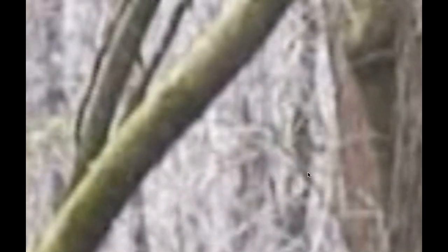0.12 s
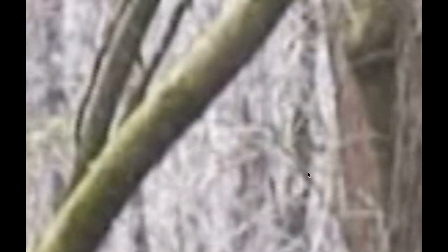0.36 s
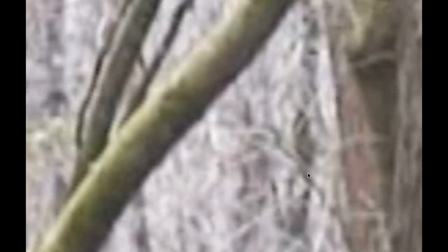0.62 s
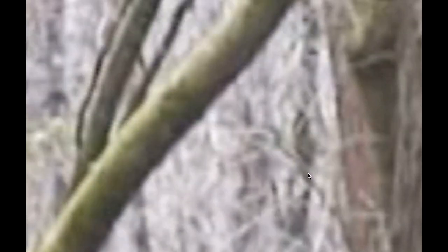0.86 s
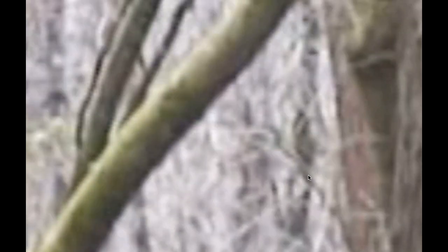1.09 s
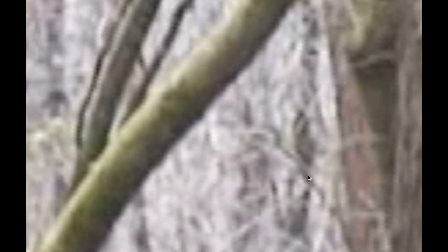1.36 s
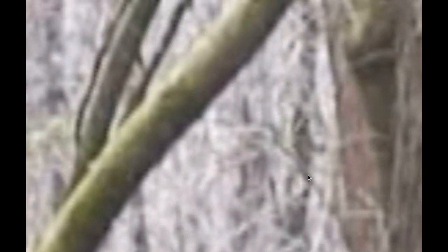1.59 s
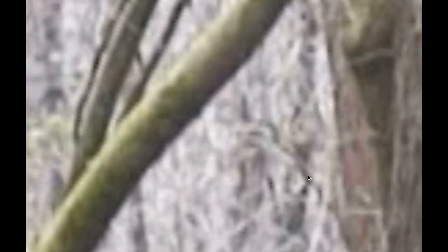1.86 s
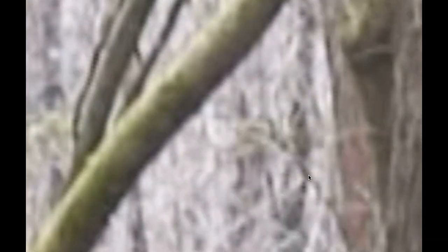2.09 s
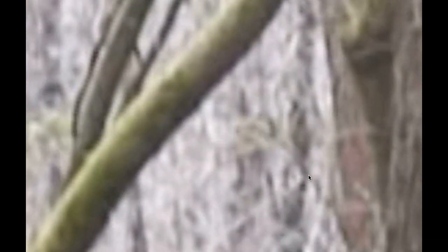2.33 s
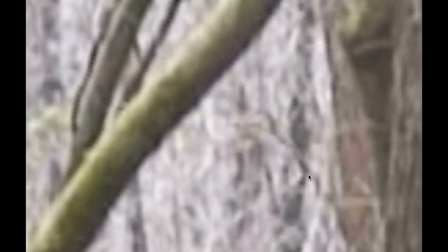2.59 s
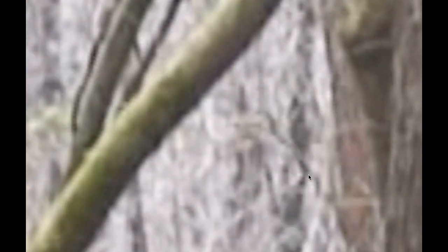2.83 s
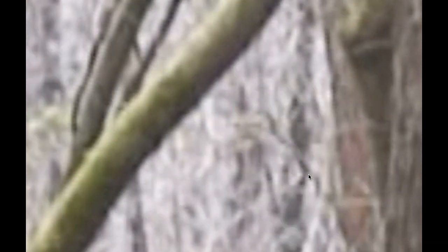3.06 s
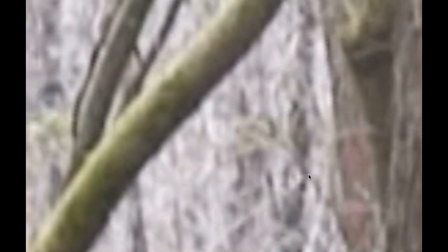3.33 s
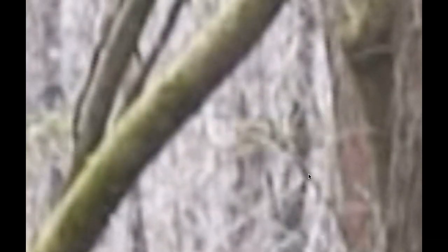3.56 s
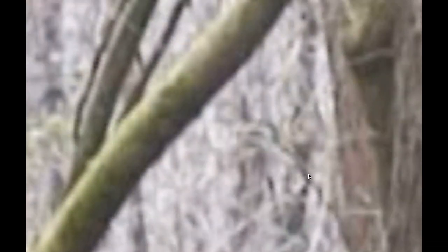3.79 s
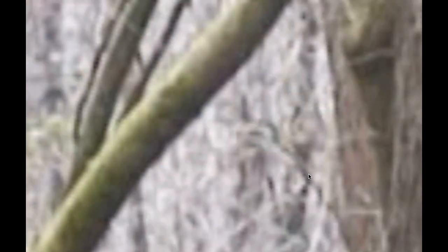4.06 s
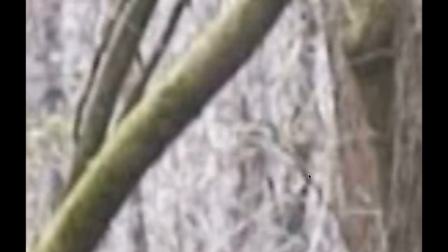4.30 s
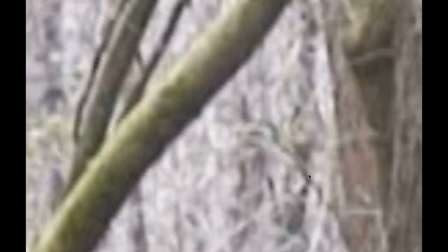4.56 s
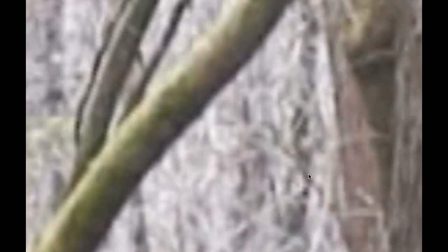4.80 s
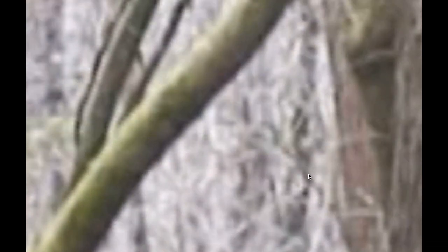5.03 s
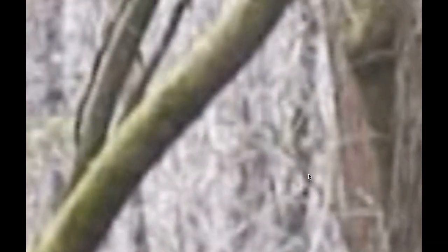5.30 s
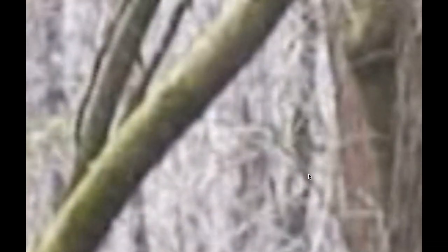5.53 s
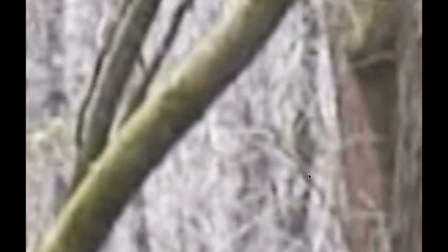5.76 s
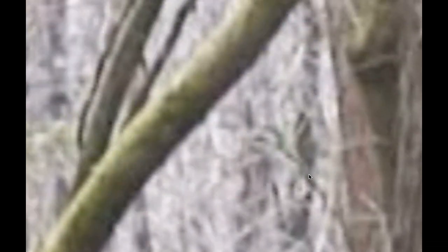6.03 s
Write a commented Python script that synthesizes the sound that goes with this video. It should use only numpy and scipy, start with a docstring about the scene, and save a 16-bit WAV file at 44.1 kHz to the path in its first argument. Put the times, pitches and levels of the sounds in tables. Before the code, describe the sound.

Soft key taps come in uneven bursts with pauses, ringing low through a laptop case, above a constant fan drone, hiss and thin whine.

```python
"""A low fan hum with hiss and a faint whine, then light typing on a laptop in a quiet room.
The microphone sits in the case: the fan shakes its modes, each thump pushes it and it rings on rubber feet.
Key clicks are bursts of tiny contacts ringing cap and plate; wires snap and buzz as keys spring back.
Fingers rustle more while typing, and skin slides once over the palm rest: both are coloured noise.
The sound card adds shaped hiss and sines near multiples of 1 kHz."""
import sys
import numpy as np
from scipy import signal
from scipy.fft import rfft, irfft, next_fast_len
from scipy.io import wavfile
from scipy.ndimage import uniform_filter1d, map_coordinates

SR = 44100
rng = np.random.default_rng(int(sys.argv[2]) if len(sys.argv) > 2 else 0)


def gain_from_db(level_db):
    """Turn a decibel level (scalar or array-like) into a linear amplitude factor."""
    decades = np.asarray(level_db, float) / 20
    return 10 ** decades


def unload_wav(signal):
    """Save mono or channel-first audio to the path in sys.argv[1] as 16-bit WAV at rate SR, clipped to [-1, 1]."""
    wavfile.write(
        sys.argv[1],
        SR,
        np.round(np.clip(np.atleast_2d(signal).T, -1, 1) * 32767).astype(np.int16),
    )


N = 270950

# key contacts: contact_s, knock_db, clack_db, tick_db (relative)
KEY_CONTACTS = [(0.4221, -50.5, -47.5, -54.5), (.4928, -53, -56, -66), (0.53, -57, -51, -63),
                (0.5364, -45.5, -38.5, -50), (.5444, -56, -51, -66), (0.5555, -51, -48, -65),
                (0.6173, -48, -44.5, -70), (0.6233, -60.5, -41.5, -44.5), (1.1867, -64, -52, -49),
                (1.255, -58, -73, -61), (1.2685, -53, -58, -54), (1.4656, -55.5, -59.5, -65.5),
                (1.517, -43, -46.5, -52), (1.5455, -55.5, -52, -60.5), (1.568, -64, -62.5, -53),
                (1.5868, -47, -57, -61), (1.5994, -47.5, -50.5, -52.5), (1.6641, -73, -73, -60),
                (1.6836, -46, -50.5, -51), (1.7404, -59, -59, -56.5), (1.7584, -48.5, -56, -57.5),
                (1.8144, -66, -61, -67), (1.8704, -60, -69, -63), (1.9672, -69, -58, -48.5),
                (2.0308, -54.5, -63, -58.5), (2.1036, -52, -61, -70), (2.13, -68, -60, -55),
                (2.174, -62.5, -65.5, -60), (2.1959, -65, -59, -60), (2.2567, -57, -68, -76),
                (2.2889, -60, -60.5, -59), (2.35, -58, -62, -65), (2.405, -59, -65, -74),
                (2.441, -68, -64, -67), (2.6339, -64, -54.5, -70.5), (3.027, -57.5, -52.5, -78),
                (3.191, -62, -55.5, -59.5), (3.261, -51, -42.5, -58), (3.3225, -68.5, -56, -56.5),
                (3.4053, -64, -53, -78), (3.4316, -53, -48.5, -72), (3.4441, -52.5, -44.5, -67.5),
                (3.4889, -72.5, -51.5, -78), (3.5272, -58, -55, -55.5), (3.5743, -61, -50, -61),
                (3.6206, -54, -48.5, -52.5), (3.6745, -57, -53.5, -60), (3.804, -62, -49, -47.5),
                (3.824, -59, -54, -64), (3.8804, -52, -53, -73), (3.8876, -54.5, -46.5, -59.5),
                (3.9436, -52, -42.5, -59.5), (3.9769, -59, -53, -81), (4.7328, -53.5, -43.5, -44.5),
                (4.8203, -63, -47.5, -64), (4.8263, -49, -44.5, -57), (4.8316, -57.5, -44.5, -55),
                (4.8516, -55, -49.5, -54), (5.1223, -68, -57, -73), (5.4512, -53, -51.5, -54),
                (5.5163, -56, -53, -67), (5.523, -52, -52, -63), (5.5727, -65, -50.5, -55),
                (5.578, -59, -52, -60), (5.594, -75, -60, -67), (5.6158, -62, -47, -55.5),
                (5.655, -69, -53.5, -54), (5.7166, -52.5, -50, -60), (5.7565, -48, -48, -51.5),
                (5.7626, -43, -61.5, -57), (5.7794, -72, -52, -65), (5.8112, -60.5, -51.5, -56.5),
                (5.9055, -42.5, -50, -52), (5.962, -57.5, -55.5, -54.5), (6.012, -55.5, -57, -52),
                (6.0936, -64, -55, -58)]
# soft fingertip pushes on the case: strike_s, case_db, panels_db (relative), time_until_hand_damps_s
CASE_STRIKES = [(.021, -43.5, -64, 0.027), (0.122, -46, -72, 0.025), (.424, -30.5, -38, 0.094),
                (.537, -31, -38, 0.018), (.553, -27.5, -46, 0.033), (0.619, -35, -46, 0.046),
                (.734, -46, -59, 0.037), (0.839, -41, -50, 0.086), (1.099, -52, -55.5, 0.066),
                (1.189, -40, -51, 0.045), (1.283, -36, -44, 0.075), (1.374, -38, -54, 0.033),
                (1.41, -41, -60, 0.093), (1.469, -35.5, -48, 0.083), (1.518, -41, -34.5, .045),
                (1.549, -35.5, -55, 0.042), (1.579, -25.5, -36, 0.086), (1.611, -25.5, -40.5, 0.039),
                (1.688, -31, -39.5, 0.19), (1.751, -26, -42.5, 0.056), (1.789, -33, -49.5, 0.027),
                (1.865, -36.5, -46, 0.072), (1.898, -37, -46, 0.036), (1.96, -37.5, -45, 0.081),
                (2.029, -36.5, -44, 0.061), (2.05, -28.5, -41.5, 0.051), (2.109, -35, -43.5, 0.074),
                (2.196, -33.5, -41.5, 0.022), (2.264, -32, -46, 0.027), (2.344, -38, -41.5, 0.094),
                (2.407, -34, -42, 0.055), (2.516, -35.5, -46, 0.081), (2.635, -43.5, -53, 0.095),
                (2.904, -41.5, -56, 0.043), (3.04, -33, -48, 0.013), (3.109, -47, -64, 0.069),
                (3.325, -28.5, -41.5, .054), (3.405, -35.5, -50.5, 0.11), (3.45, -36, -47, 0.085),
                (3.535, -22.5, -42, 0.043), (3.575, -37, -53, 0.021), (3.627, -38, -48.5, 0.035),
                (3.686, -30.5, -40, 0.016), (3.708, -32.5, -55, 0.031), (3.807, -43, -47, 0.071),
                (3.898, -27.5, -39.5, 0.054), (3.946, -34, -48, 0.04), (4.049, -39, -52, 0.051),
                (4.744, -25.5, -36.5, 0.067), (4.837, -31, -37.5, .059), (5.14, -44.5, -73, 0.034),
                (5.455, -22.5, -40, 0.058), (5.528, -40, -39.5, 0.027), (5.568, -33.5, -50, 0.068),
                (5.629, -36.5, -47, .038), (5.661, -22, -40, 0.047), (5.715, -31, -41, 0.062),
                (5.764, -30.5, -45, 0.043), (5.818, -24, -41.5, 0.043), (5.859, -32.5, -43.5, 0.1),
                (5.91, -36, -41, .036), (5.965, -23.5, -35.5, 0.054), (6.014, -45, -44, 0.044),
                (6.105, -28.5, -42, 0.042)]


def unit(x):
    """Scaled to rms 1."""
    return x / np.sqrt(np.mean(x ** 2) + 1e-20)


def wobble(rate_hz):
    """A smooth random curve through rate_hz knots a second."""
    knots = rng.standard_normal(int(N * rate_hz / SR) + 4)
    return map_coordinates(knots, [np.arange(N) * rate_hz / SR])


def filtered(x, response):
    """x through a complex response of frequency."""
    m = next_fast_len(N + 8192)
    return irfft(rfft(x, m) * response(np.fft.rfftfreq(m, 1 / SR)), m)[:N]


def noise(response):
    """Noise of rms 1 shaped by a response of frequency."""
    return unit(filtered(rng.standard_normal(N), response))


def coloured(points):
    """Noise of rms 1 along (Hz, dB) points on a log axis."""
    point_hz, point_db = np.transpose(points)
    return noise(lambda hz: gain_from_db(np.interp(np.log(hz + 1), np.log(point_hz + 1), point_db)))


def resonances(modes):
    """Causal response of (Hz, width Hz, dB) modes, neighbours in opposite phase."""
    def response(hz):
        total = 0
        for k, (centre_hz, width_hz, db) in enumerate(modes):
            damping = 1j * hz * width_hz
            total = total + (-1) ** k * gain_from_db(db) * damping / (centre_hz ** 2 - hz ** 2 + damping)
        return total
    return response


def ring(modes, t, attack_s, scatter_db, detune):
    """One push on (Hz, dB, t60 s) modes, each at a new strength and pitch, neighbours in opposite phase."""
    hz, db, t60_s = np.transpose(modes)[:, :, None]
    strength, shift = rng.standard_normal((2, len(modes), 1))
    sign = (-1) ** np.arange(len(modes))[:, None]
    envelope = gain_from_db(db + scatter_db * strength - 60 * t / t60_s)
    waves = sign * envelope * np.sin(2 * np.pi * hz * (1 + detune * shift) * t)
    return waves.sum(axis=0) * (1 - np.exp(-t / attack_s))


def chatter(t, rise_s, fall_s, grain_db):
    """A burst of tiny uneven contacts, energy 1."""
    sizes = gain_from_db(grain_db * rng.standard_normal(len(t))) * rng.standard_normal(len(t))
    burst = sizes * (1 - np.exp(-t / rise_s)) * np.exp(-t / fall_s)
    return burst / np.linalg.norm(burst)


def rung(blows, modes, top_hz):
    """Blows ringing in a set of modes, rolled off steeply above top_hz."""
    def response(hz):
        x = hz / top_hz
        return resonances(modes)(hz) / (1 + 1j * x) ** 2 / np.sqrt(1 + x ** 12)
    return filtered(blows[:N], response)


def add(track, start_s, sound):
    """Lays a sound on the track at start_s."""
    track[round(start_s * SR):][:len(sound)] += sound


def fan():
    """The fan drones at multiples of its speed and shakes the case modes steadily."""
    # case modes: centre_hz, width_hz, level_db (relative)
    hum_modes = [(119, 8.9, -8.5), (167, 16, -8), (202, 20.6, -7), (237, 18.6, -6.5), (259, 81, -13.5),
                 (333, 63, -19.5)]
    # drone partials: multiple_of_fan_speed, mean_level_db (rms)
    fan_orders = [(5, -61), (6, -55), (7, -62.5)]
    fan_hz = 33.43
    case = gain_from_db(-58 + .8 * wobble(3)) * noise(resonances(hum_modes))
    turns = np.cumsum(fan_hz * (1 + .004 * wobble(6))) / SR
    drone = np.zeros(N)
    for order, db in fan_orders:
        level = np.sqrt(2) * gain_from_db(db + 1.45 * wobble(8))
        drone += level * np.sin(2 * np.pi * (order * turns + rng.random()))
    return case + drone


def finger_rustle():
    """Fingers rustle as wavering coloured noise, louder where thumps are dense."""
    # spectrum: frequency_hz, density_db (relative, per Hz)
    rustle_points = [(210, -56), (350, -1), (484, -7.5), (525, -7.5), (611, -8), (1250, -14.5),
                     (1420, -14.5), (1540, -15.5), (1770, -13.5), (3000, -21), (3900, -26.5), (6600, -120)]
    rest_db, busy_db, busy_s = -68.5, 2, 0.2  # level at rest, rise at ten thumps a second, averaging span
    struck_samples = np.round(np.array(CASE_STRIKES)[:, 0] * SR).astype(int)
    struck = np.bincount(struck_samples, minlength=N)[:N] * SR / 10
    span = round(busy_s * SR)
    busy = np.abs(uniform_filter1d(uniform_filter1d(struck, span), span))
    return gain_from_db(rest_db + busy_db * np.sqrt(busy) + 0.95 * wobble(3.9)) * coloured(rustle_points)


def rumble():
    """Steady low noise under the hum."""
    # spectrum: frequency_hz, density_db (relative, per Hz)
    rumble_points = [(8.8, -14), (15, 0), (49, -0.5), (96, -7), (124, -3), (140, -10.5), (180, -22),
                     (310, -120)]
    return gain_from_db(-57.5) * coloured(rumble_points)


def sound_card():
    """Amplifier hiss as shaped noise; data-clock whine as sines at multiples of nearly 1 kHz."""
    # spectrum: frequency_hz, density_db (relative, per Hz)
    hiss_points = [(590, -21), (1000, -4.5), (1380, -12), (1930, 0.5), (2380, -9.5), (3950, -6), (4590, -5),
                   (15800, -9)]
    # clock multiples 1, 2, ..: level_db (rms)
    whine_db = [-85.5, -85.5, -88.5, -88.5, -88.5, -91.5, -89.5, -92.5, -91, -100]
    clock_hz = 999.92
    t = np.arange(N) / SR
    whine = np.zeros(N)
    for multiple, db in enumerate(whine_db, 1):
        whine += np.sqrt(2) * gain_from_db(db) * np.sin(2 * np.pi * (multiple * clock_hz * t + rng.random()))
    return gain_from_db(-69) * coloured(hiss_points) + whine


def thumps():
    """Soft fingertips push the case; it rings on rubber feet until the hand settles; the desk gives."""
    # case on its feet: pitch_hz, level_db (relative), t60_s
    case_modes = [(156.6, -13, 0.15), (201.5, -0.5, 0.38), (229.9, -11, 0.23)]
    # stiffer panels of the case: pitch_hz, level_db (relative), t60_s
    panel_modes = [(283.6, 1, 0.12), (323.9, -7.5, 0.23), (355, -7, 0.1)]
    # heavier strokes under which the desk gives: strike_s, level_db (relative)
    desk_strokes = [(0.423, -36), (1.099, -53), (1.189, -44), (1.283, -41.5), (1.549, -46), (1.58, -34.5),
                    (1.752, -37), (1.898, -44.5), (2.05, -38), (2.344, -42), (3.45, -46), (3.535, -41),
                    (4.745, -39), (4.837, -43.5), (5.662, -42), (5.817, -40)]
    out = np.zeros(N + SR)
    t = np.arange(SR // 3) / SR
    lead_s = .008  # push starts ahead of the listed time
    for strike_s, db, panel_db, free_s in CASE_STRIKES:
        damped = 0.23 + 0.66 * np.exp(-(t / free_s) ** 4)
        case = -damped * ring(case_modes, t, attack_s=0.015, scatter_db=0.36, detune=0.017)
        panels = ring(panel_modes, t, attack_s=0.0079, scatter_db=2.6, detune=0.046)
        add(out, strike_s - lead_s, gain_from_db(db + 3) * case + gain_from_db(panel_db + 4) * panels)
    push = np.sin(2 * np.pi * 85 * t) * (1 - np.exp(-t / 0.0041)) * np.exp(-t / 0.0121)  # hardly rings
    for strike_s, db in desk_strokes:
        add(out, strike_s - lead_s, gain_from_db(db + 0.5) * push)
    return out[:N]


def keys():
    """Contact bursts in the key hinge ring cap and plate; the cap scrapes before and settles after."""
    # parts of a click, each: centre_hz, width_hz, level_db (relative)
    knock_modes = [(402, 50, 1), (608, 78, 5), (776, 210, -0.5), (874, 115, 1), (1010, 510, -12.5)]
    clack_modes = [(1141, 120, -4.5), (1440, 255, -5), (1725, 306, 0), (1851, 170, 4), (2275, 93, -3),
                   (2338, 220, -5.5)]
    tick_modes = [(2090, 370, 2.5), (4020, 1180, -1.5), (4730, 590, -1.1), (5930, 610, -3.5)]
    knock, clack, tick = np.zeros((3, N + SR))
    t = np.arange(SR // 10) / SR
    for contact_s, knock_db, clack_db, tick_db in KEY_CONTACTS + brushes():
        # hinge rattles longer the more knock outweighs tick
        rattle_s = max(0.003775 + .00004 * (knock_db - tick_db), .001)
        start_s = contact_s - 0.295 * rattle_s
        # crisp keys land clean, dull ones scrape first
        loose = 1 / (1 + gain_from_db(2 * (tick_db - clack_db - 1)))
        scrape = loose * chatter(t, 0.00059, 0.005, 20)[::-1]  # swells up to the contact
        add(clack, start_s - t[-1], gain_from_db(clack_db + 22.5) * scrape)
        add(tick, start_s - t[-1], gain_from_db(tick_db + 25) * scrape)
        add(knock, start_s, gain_from_db(knock_db + 39) * chatter(t, 0.00024, 0.0012 + rattle_s, 2.9))
        add(clack, start_s, gain_from_db(clack_db + 38) * chatter(t, 0.13 * rattle_s, rattle_s, 15.2))
        add(tick, start_s, gain_from_db(tick_db + 30) * chatter(t, 0.18 * rattle_s, 0.78 * rattle_s, 2.9))
        add(clack, contact_s + .006, gain_from_db(clack_db + 14) * chatter(t, 0.0014, 0.025, 18.6))  # settling
    knocks = rung(knock, knock_modes, top_hz=2450)
    clacks = rung(clack, clack_modes, top_hz=4200)
    return knocks + clacks + rung(tick, tick_modes, top_hz=8500)


def brushes():
    """Fingers brush neighbouring caps after some keys at random; rows like KEY_CONTACTS."""
    share, mean_delay_s, scatter_db = .35, .07, 3
    mean_db = (-64, -62.5, -62)  # knock, clack, tick
    key_s = np.array(KEY_CONTACTS)[:, 0]
    pick, delay = rng.random((len(key_s), 2)).T
    brush_s = np.minimum(key_s - mean_delay_s * np.log(delay + 1e-9), N / SR)
    levels_db = mean_db + scatter_db * rng.standard_normal((len(key_s), 3))
    return list(np.column_stack([brush_s, levels_db])[pick < share])


def snaps():
    """A key springing back snaps its wire on metal hooks; the wire buzzes, less if caught hard."""
    # keys springing back: snap_s, wire_db, hook_db (relative), rattle_decay_s
    snap_rows = [(0.616, -30.5, -45, 0.0039), (.6224, -44, -70, .002), (1.518, -30, -32.5, 0.00082),
                 (1.683, -34.5, -38, 0.001), (1.692, -36.5, -65, .002), (2.543, -43.5, -69, 0.0016),
                 (3.028, -36, -62.5, .0017), (3.257, -46, -62, 0.0011), (3.325, -45, -64.5, .002),
                 (3.4435, -32.5, -49, 0.00083), (3.525, -43, -62.5, .0018), (3.625, -39, -61.5, .0013),
                 (3.9424, -35, -57, 0.0014), (4.73, -50, -75, .002), (5.448, -42, -63, .0018),
                 (5.572, -37.5, -60.5, .0018), (5.649, -44, -62, .002), (5.759, -31.5, -56, .0035),
                 (5.905, -30, -51, .0035)]
    # wire, then hooks: centre_hz, width_hz, level_db (relative)
    wire_modes = [(6800, 3300, -10.5), (8410, 45, 6.5), (8330, 350, 1.5), (9920, 1400, -4)]
    hook_modes = [(11240, 1400, 0), (11900, 1100, 0)]
    wire, hook = np.zeros((2, N + SR))
    t = np.arange(SR // 16) / SR
    for snap_s, wire_db, hook_db, rattle_s in snap_rows:
        burst = chatter(t, 0.00074, rattle_s, 7.1)
        free = 1 / (1 + gain_from_db(hook_db - wire_db + 14))
        buzz = free * gain_from_db(-4) * chatter(t, 0.004, 0.02, 9)
        add(wire, snap_s - .001, gain_from_db(wire_db + 15.5) * (burst + buzz))
        add(hook, snap_s - .001, gain_from_db(hook_db + 25) * burst)
    return rung(wire, wire_modes, top_hz=12000) + rung(hook, hook_modes, top_hz=13300)


def room(x, t60_s, dull_hz):
    """The small room answers with a short dull tail of decaying noise."""
    hz, t, z = signal.stft(rng.standard_normal(SR // 3), SR, nperseg=256)
    z = z * gain_from_db(-60 * t / t60_s) / (1 + (hz[:, None] / dull_hz) ** 2)
    tail = signal.istft(z, SR, nperseg=256)[1]
    delayed = np.pad(x, (200, 0))
    return signal.fftconvolve(delayed, tail / np.linalg.norm(tail))[:N]


def slide():
    """Skin drags briefly over the palm rest: grainy noise follows the speed of the hand."""
    # spectrum: frequency_hz, level_db (relative)
    skin_points = [(300, -44), (500, -2), (1300, -5), (1900, 1), (2600, -9.5), (6000, -11.5), (9000, -15),
                   (12000, -28), (16000, -60)]
    fastest_s, level_db, rise_s, fall_s = 0.865, -59.5, 0.057, 0.078
    t = np.arange(N) / SR - fastest_s
    speed = np.exp(-(t / np.where(t < 0, rise_s, fall_s)) ** 2 / 2)
    grain = gain_from_db(.8 * wobble(70))
    return gain_from_db(level_db) * speed * grain * coloured(skin_points)


def scene():
    """Fan, fingers, case, keys, room and hand at the one microphone."""
    background = fan() + finger_rustle() + rumble()
    clicks = keys() + snaps()
    tail = gain_from_db(-13.5) * room(clicks, t60_s=0.14, dull_hz=7440)
    return (background + thumps() + clicks + tail + slide())[None]


def band_limit(x):
    """A steep low-pass at the top of the band."""
    return signal.sosfilt(signal.butter(12, 15930, fs=SR, output="sos"), x)


def record(dry):
    """The sound card adds its hiss and whine to the microphone signal."""
    return band_limit(dry + sound_card())


dry = scene()
out = record(dry)
unload_wav(out)
```